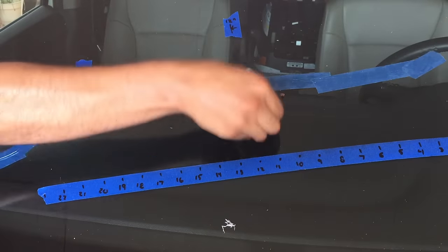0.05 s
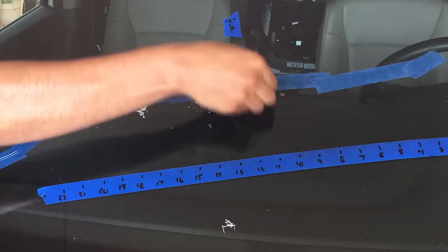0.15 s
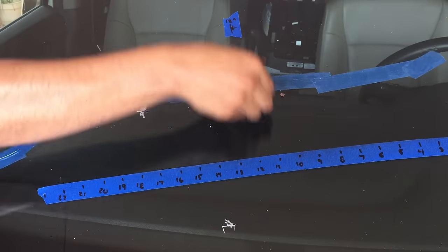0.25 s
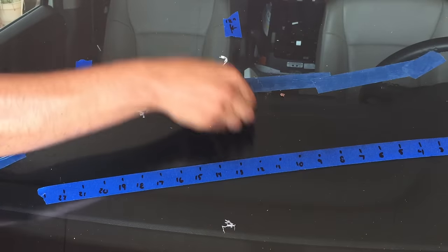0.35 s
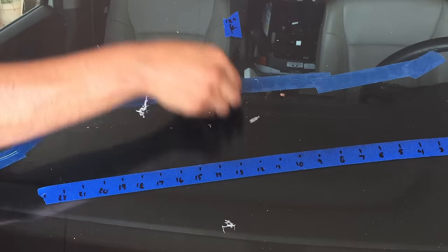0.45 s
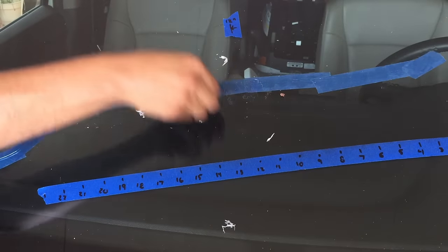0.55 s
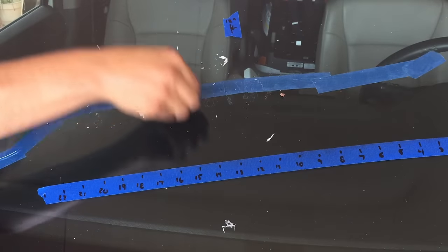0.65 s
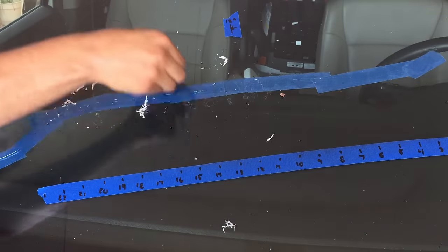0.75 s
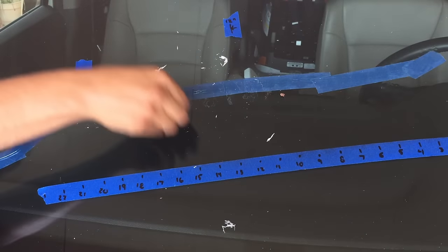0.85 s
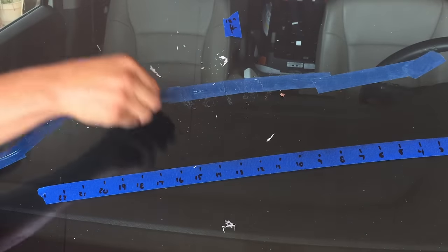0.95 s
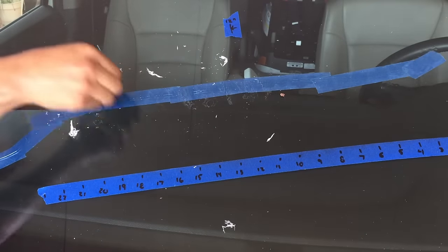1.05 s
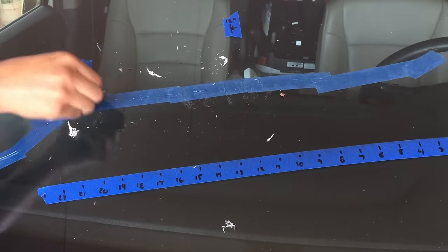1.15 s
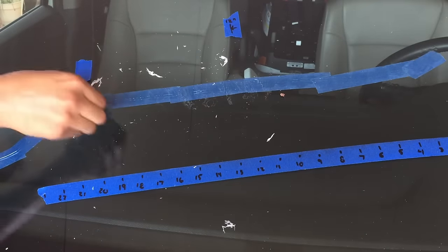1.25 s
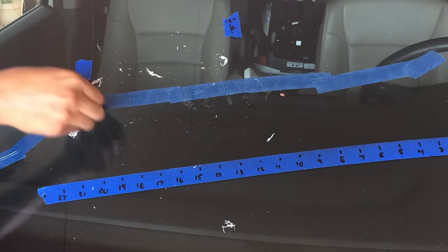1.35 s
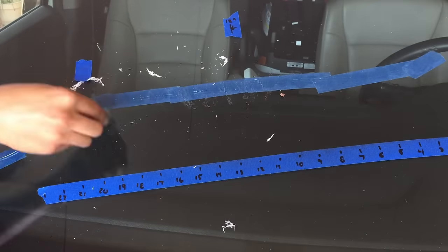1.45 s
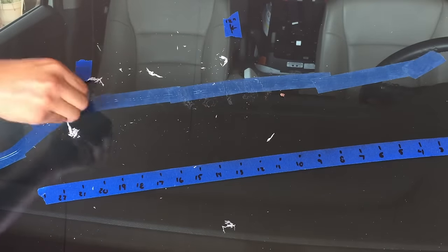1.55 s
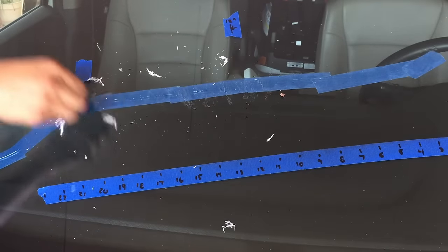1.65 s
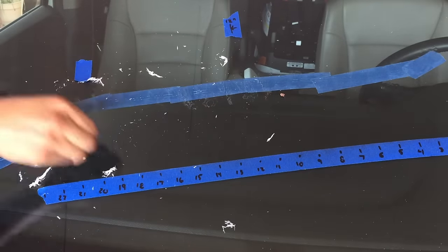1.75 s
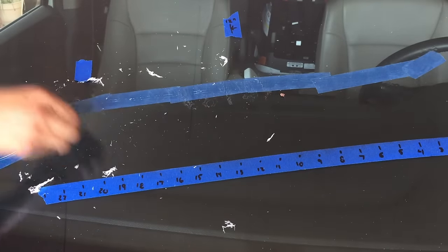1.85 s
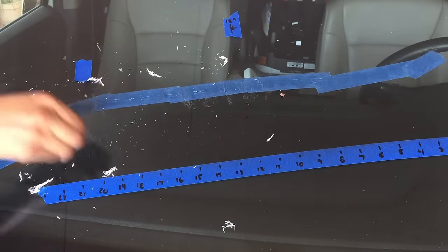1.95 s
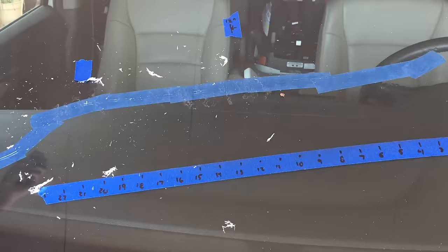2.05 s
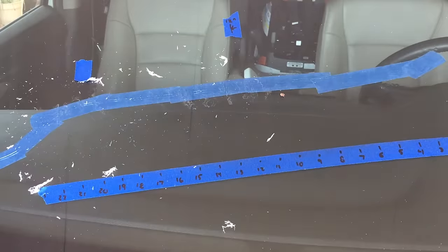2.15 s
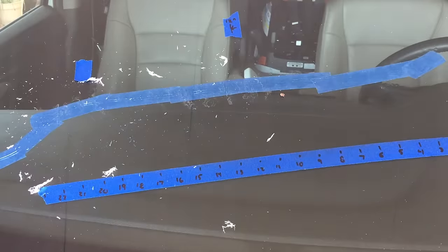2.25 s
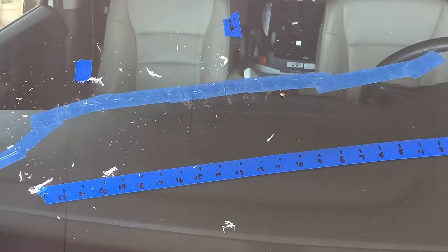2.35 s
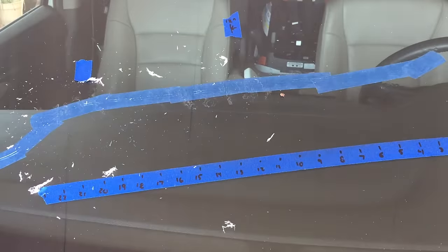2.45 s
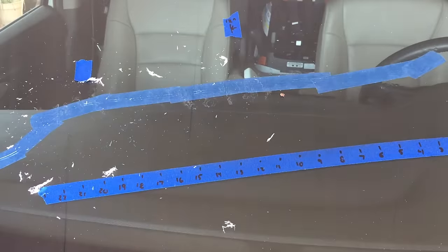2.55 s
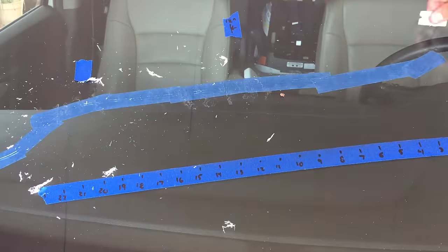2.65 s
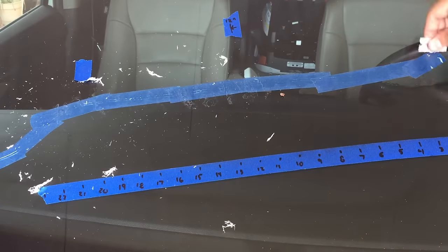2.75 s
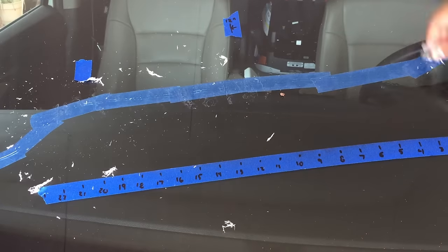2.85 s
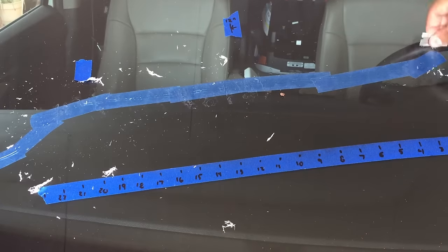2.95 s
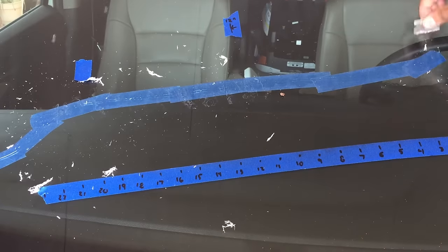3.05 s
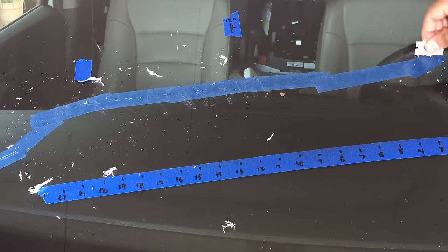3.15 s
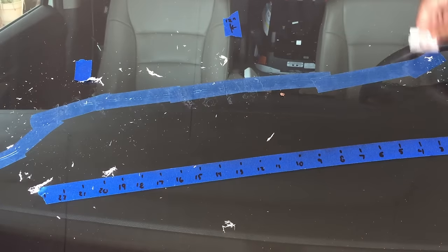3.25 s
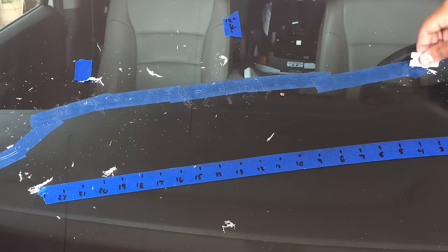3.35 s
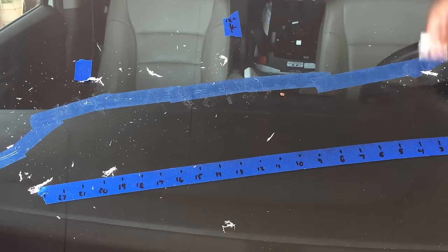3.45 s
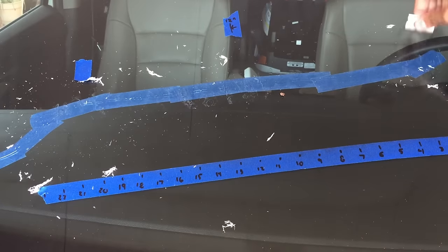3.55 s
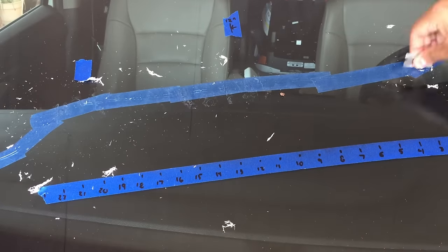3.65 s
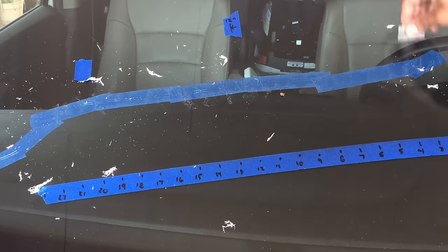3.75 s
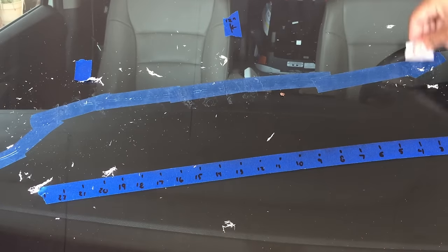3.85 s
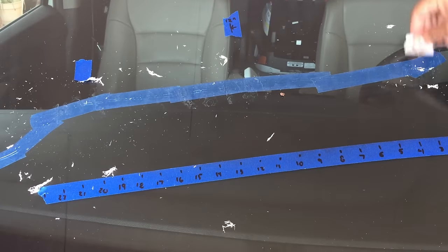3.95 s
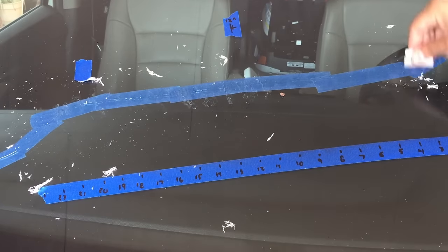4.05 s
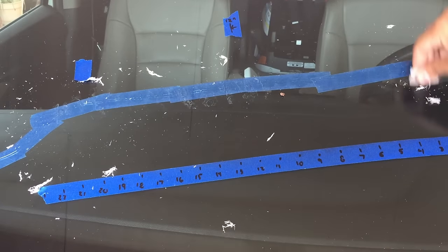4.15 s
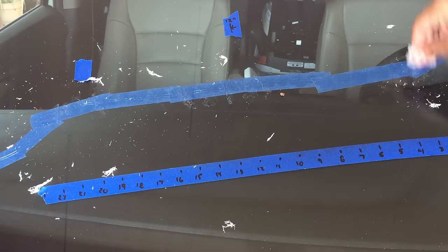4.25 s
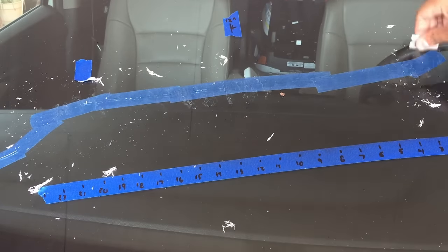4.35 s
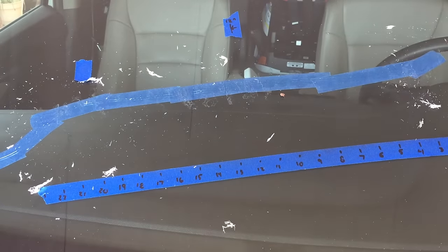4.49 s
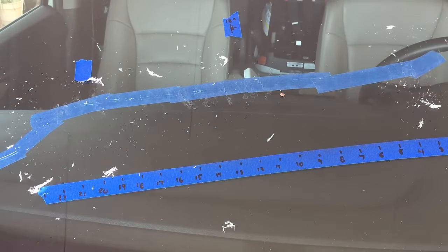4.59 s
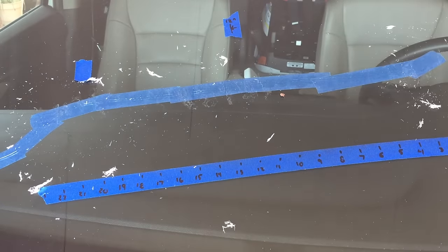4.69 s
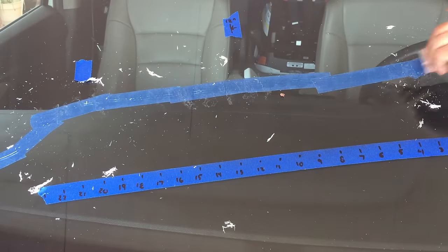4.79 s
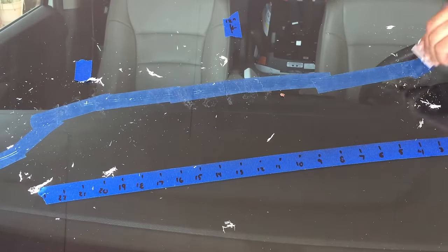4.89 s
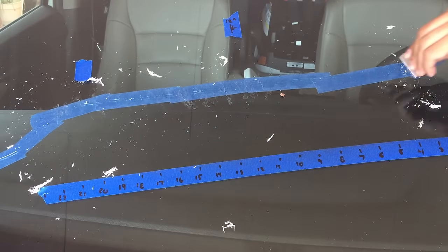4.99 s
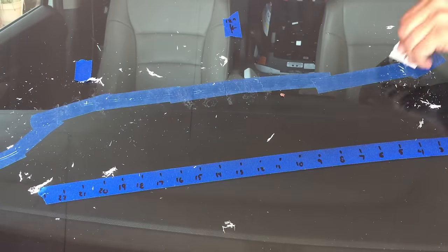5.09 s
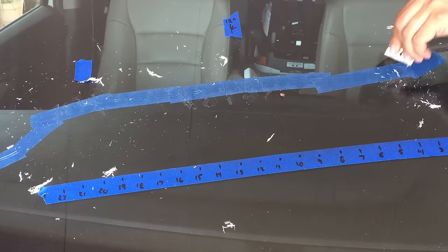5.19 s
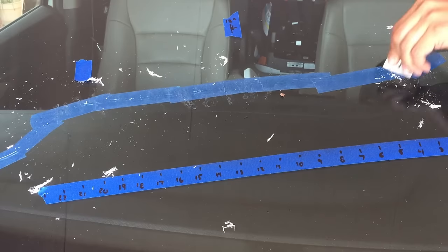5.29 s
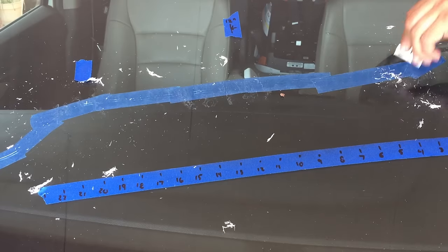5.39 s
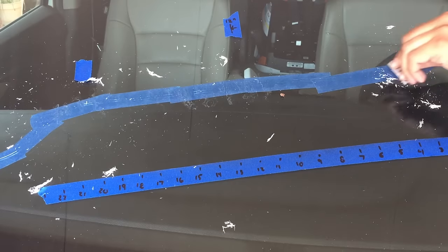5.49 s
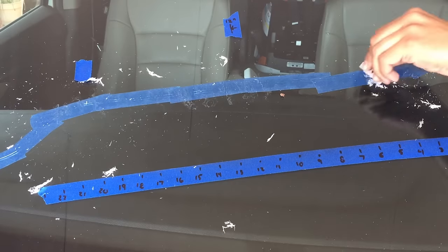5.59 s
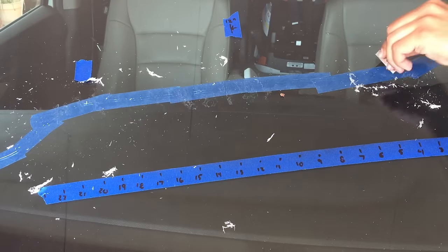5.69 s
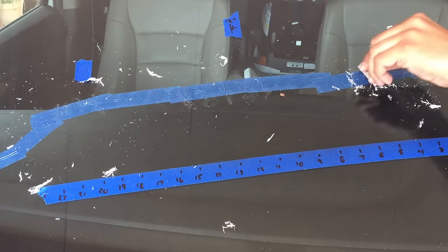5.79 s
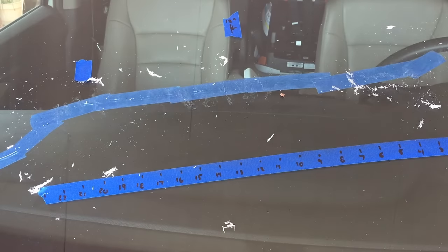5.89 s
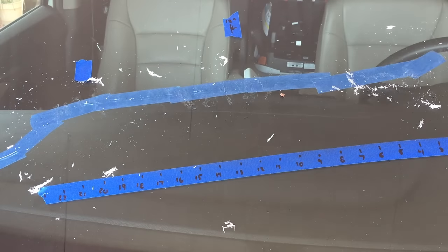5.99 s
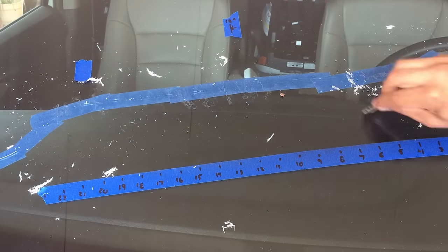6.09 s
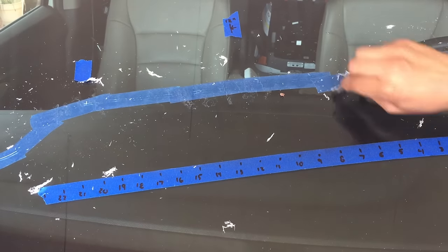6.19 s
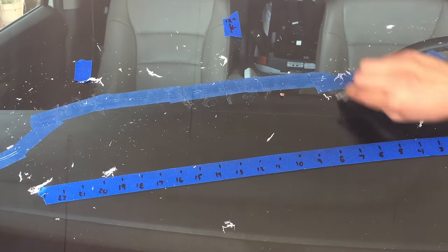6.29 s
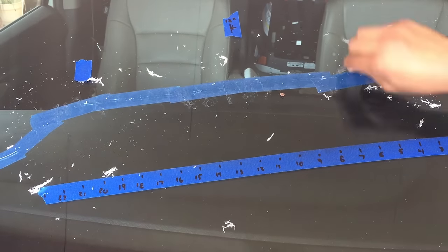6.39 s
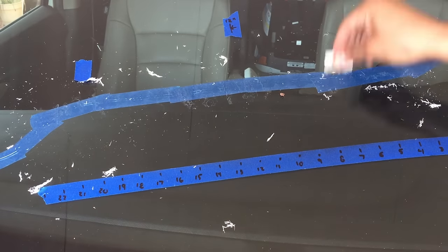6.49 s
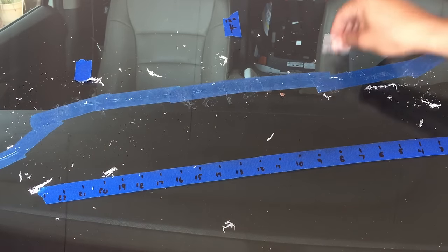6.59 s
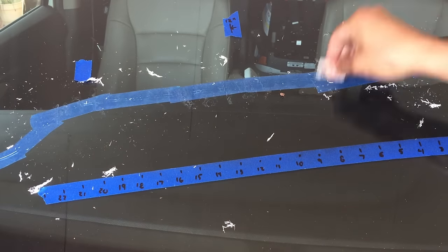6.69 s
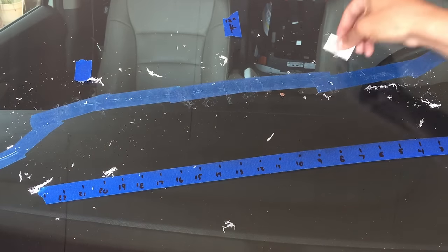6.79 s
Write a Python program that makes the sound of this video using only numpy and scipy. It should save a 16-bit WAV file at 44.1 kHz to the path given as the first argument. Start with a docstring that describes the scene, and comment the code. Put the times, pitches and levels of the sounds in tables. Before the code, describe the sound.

Fast-motion blade work on glass: some thirty gritty ticks and scrapes a second, each a tiny crackling bite with a short skid, a faint glassy ring and bright sizzle. The first long stretch is strongest, and stops just after two seconds. Later bursts are thinner and tinnier, then rougher near the end. Steady pitched motor hum and faint air fill the gaps; a far engine's sped-up drone passes briefly twice. Close, dry, mono outdoor sound.

```python
"""A razor blade chops in short strokes, sped up about eightfold, at hardened resin on a car windshield, outdoors.
Each stroke is a noise burst of tiny cracks, filtered into scratch, thump, sizzle, glass and blade rings.
Sped-up motor hum: wavering multiples of three base pitches, and fuzzy bands of noise.
A thin wash of air is shaped noise; twice a distant engine drones on two multiples of its firing rate."""
import sys
import numpy as np
from scipy import signal
from scipy.fft import rfft, irfft
from scipy.io import wavfile
from scipy.ndimage import uniform_filter1d

SR = 44100
rng = np.random.default_rng(int(sys.argv[2]) if len(sys.argv) > 2 else 0)


def log_audio(samples):
    """Write samples as a 16-bit WAV file to the path given in sys.argv[1]."""
    # one column per channel
    frames = np.atleast_2d(samples).T
    # limit to full scale, then quantise
    limited = np.clip(frames, -1, 1)
    pcm = np.round(limited * 32767).astype(np.int16)
    wavfile.write(sys.argv[1], SR, pcm)


N = 301195
SPAN, LEAD = 4096, 512  # samples: one stroke's buffer, the part of it before the hit


def gain_of(db):
    """Amplitude factor of a level in dB."""
    return 10 ** (np.asarray(db) / 20)


def evened(x):
    """Scale each row to unit rms."""
    return x / np.sqrt(np.mean(abs(x) ** 2, axis=-1, keepdims=True) + 1e-20)


def read(points, hz):
    """Straight dB lines on a log-frequency axis, -100 dB outside the table."""
    point_hz, db = np.transpose(points)
    return np.interp(np.log(hz + 1), np.log(point_hz + 1), db, -100, -100)


def fuzzy_line(hz, width_hz):
    """A tone whose strength and phase wander, the faster the wider the line."""
    keep = np.exp(-np.pi * width_hz / SR)
    noise = rng.standard_normal(N) + 1j * rng.standard_normal(N)
    wander = evened(signal.lfilter([1], [1, -keep], noise))
    return wander * np.exp(2j * np.pi * np.cumsum(hz * np.ones(N)) / SR)


# Spectrum shape of the air. Each row: frequency in Hz, relative level in dB per Hz.
AIR_SHAPE = [(30, -52), (200, -52), (290, -13.5), (380, 5.5), (700, 6.5), (1300, 4.5), (2500, -2),
             (3700, -7), (7000, -5), (10000, -10.5), (15500, -14.5), (16100, -44)]
AIR_RMS_DB, PATCH_DB = -42.5, 1.2


def air():
    """Random short-time spectra with mild drifting patches."""
    frames, hz = N // 256 + 5, np.fft.rfftfreq(1024, 1 / SR)
    real, imag, patches = rng.standard_normal((frames, 513, 3)).T
    patches = uniform_filter1d(patches, size=12, axis=0)  # over frequency bins
    patches = evened(uniform_filter1d(patches, size=10, axis=1))  # over frames
    spectra = (real + 1j * imag) * gain_of(read(AIR_SHAPE, hz)[:, None] + PATCH_DB * patches)
    wash = signal.istft(spectra, nperseg=1024, noverlap=768)[1][:N]
    return gain_of(AIR_RMS_DB) * evened(wash)


# Sped-up hums. Each row: base pitch in Hz, list of lines (multiple, rms level in dB, waver width in Hz).
HUM_LINES = [(469.3, [(1, -52, 4), (3, -52.5, 2.1), (4, -50, 27), (14, -51, 1.3), (16, -58, 5.7),
             (20, -62, 3)]), (568.4, [(1, -49, 5.2), (2, -46, 1.7), (3, -54, 6.1), (4, -60.5, 9.2),
             (6, -60.5, 8.1), (9, -60.5, 9.9)]), (960, [(1, -63.5, 3.8), (2, -55.5, 5)])]
# Fuzzy bands. Each row: centre in Hz, width in Hz, rms level in dB.
WHIRR_BANDS = [(476, 8.2, -79), (3370, 70, -56.5), (4980, 170, -59.5), (2120, 23, -58.5)]
WAVER = 0.28  # fuzzy part, relative to the steady core


def motor_hum():
    """Multiples of a base pitch that waver around a steady core, and a few fuzzy bands."""
    out, t = np.zeros(N), np.arange(N) / SR
    for base_hz, lines in HUM_LINES:
        for multiple, db, width_hz in lines:
            hz = round(multiple) * base_hz
            core = np.exp(2j * np.pi * (hz * t + rng.random()))
            out += gain_of(db) * evened((core + WAVER * fuzzy_line(hz, width_hz)).real)
    for hz, width_hz, db in WHIRR_BANDS:
        out += gain_of(db) * evened(fuzzy_line(hz, width_hz).real)
    return out


# Distant engine, one table per pass. Each row: time in seconds, firing rate in Hz,
# steady rms level in dB of the 2nd multiple, of the 3rd.
ENGINE_PASSES = [
    [(1.8, 405, -60, -70), (1.835, 408, -43, -66), (1.99, 440, -42, -66), (2.04, 445, -60, -70)],
    [(4.75, 356, -62, -70), (4.79, 356, -47, -60), (4.92, 356, -48, -47), (5.08, 356, -45, -62),
     (5.14, 354, -56, -62), (5.2, 353, -46, -58), (5.56, 350, -47, -58), (5.7, 342, -64, -70),
     (5.93, 337, -51, -70), (6.13, 335, -50, -70), (6.2, 334, -60, -70)],
]


def engine():
    """Two multiples of a gliding firing rate, each a steady tone plus a wavering one."""
    out, t = np.zeros(N), np.arange(N) / SR
    for rows in ENGINE_PASSES:
        time_s, rate_hz, *levels_db = np.transpose(rows)
        firing_hz = np.interp(t, time_s, rate_hz)
        for multiple, db in zip((2, 3), levels_db):
            steady = np.exp(2j * np.pi * multiple * np.cumsum(firing_hz) / SR)
            tone = (steady + .4 * fuzzy_line(multiple * firing_hz, 12)).real
            out += gain_of(np.interp(t, time_s, db, -200, -200)) * tone
    return np.sqrt(2) * out  # sine peak to rms


# Blade strokes. Each row: start in seconds, bite length in ms, scratch rms level over the bite in dB.
STROKE_ROWS = [(0.0124, 1.9, -29.5), (0.0419, 7.1, -24.5), (0.0738, 4.3, -23), (0.1066, 5.8, -24.5),
               (0.1332, 4.8, -35), (0.153, 2.1, -12.5), (0.175, 2.5, -27), (0.196, 5.7, -20),
               (0.218, 2.5, -32), (0.2374, 5.4, -19.5), (0.2761, 1.4, -14), (0.318, 3.4, -17),
               (0.3604, 5.2, -22), (0.3998, 2.8, -23.5), (0.4436, 7.4, -16.5), (0.4817, 4.9, -23.5),
               (0.522, 2.8, -26), (0.5413, 3, -30), (0.5628, 2.8, -23), (0.583, 1.6, -26),
               (0.6043, 6.2, -16), (0.641, 4.8, -19), (0.665, 2.1, -28), (0.6821, 4.5, -14),
               (0.7213, 6.3, -15.5), (0.7582, 9, -18.5), (0.793, 3.2, -12.5), (0.8316, 4.8, -19.5),
               (0.8539, 8, -35), (0.872, 4.5, -19.5), (0.892, 8.2, -34), (0.913, 4.3, -25.5),
               (0.9393, 8.3, -33.5), (0.9777, 3.8, -19), (0.9842, 4.1, -19.5), (1.0137, 9, -24),
               (1.0496, 7.6, -28.5), (1.0917, 2.9, -16), (1.1203, 2.6, -18.5), (1.1269, 5.9, -20.5),
               (1.163, 1.9, -24.5), (1.195, 3.7, -28.5), (1.212, 2.1, -29), (1.2276, 4.9, -15.5),
               (1.2614, 7.8, -23), (1.2948, 8.2, -27.5), (1.3308, 8.7, -39), (1.359, 14, -27.5),
               (1.3954, 6.8, -23.5), (1.4282, 4.2, -22.5), (1.455, 5.9, -28.5), (1.4857, 4.1, -22),
               (1.6017, 5.2, -32.5), (1.6372, 3.6, -20.5), (1.668, 3.3, -25.5), (1.7012, 3.9, -26),
               (1.739, 2.4, -18.5), (1.7746, 3.0, -26.5), (1.79, 3.2, -29), (1.8123, 3.4, -21.5),
               (1.822, 4.4, -27), (1.8373, 5.7, -29.5), (1.8453, 4.4, -24.5), (1.8761, 6.6, -25.5),
               (1.9094, 3.6, -17), (1.9405, 5, -20.5), (1.953, 12, -35), (1.975, 3, -11.5),
               (2.009, 3.3, -11), (2.025, 2.8, -28), (2.0445, 4, -14.5), (2.078, 4.5, -14),
               (2.7768, 4.2, -23.5), (2.8031, 2.3, -25.5), (2.8307, 3, -23.5), (2.8567, 5.1, -26),
               (2.8844, 2.8, -24.5), (2.9105, 3.4, -25.5), (2.9366, 5.2, -27), (2.9637, 8.1, -29),
               (2.9918, 5.5, -27.5), (3.0212, 3.7, -28.5), (3.0453, 4.3, -34), (3.1799, 1.8, -24),
               (3.2063, 2.8, -31), (3.233, 1.6, -24.5), (3.2577, 3.6, -28.5), (3.2849, 5.5, -26.5),
               (3.3132, 1.8, -21), (3.3417, 2.5, -21.5), (3.3693, 5, -20.5), (3.3992, 5.1, -21),
               (3.4313, 2.4, -21), (3.463, 7.1, -25), (3.5026, 6.9, -26), (3.5414, 3.8, -28),
               (3.5806, 2.6, -26.5), (3.616, 9, -31.5), (3.6529, 4.8, -24.5), (3.6918, 4.5, -30),
               (3.7257, 4.6, -23.5), (3.9238, 7.7, -35), (3.9579, 4.5, -27.5), (3.9921, 6.6, -40),
               (4.0244, 2.2, -25), (4.0587, 4.1, -24), (4.0893, 6.4, -28), (4.1223, 6.6, -22.5),
               (4.1565, 4.7, -20), (4.19, 2.7, -17.5), (4.2262, 2.7, -15), (4.2671, 7.9, -23),
               (4.3058, 3.4, -18.5), (4.3432, 2, -17), (4.382, 7.3, -26.5), (4.4175, 2.3, -25),
               (4.4504, 4.2, -27.5), (4.483, 5.3, -23.5), (4.5169, 3.5, -29), (4.8484, 4.5, -30),
               (4.8591, 5.8, -32), (4.892, 3.4, -29.5), (4.9206, 8.5, -34), (4.9584, 2.6, -25),
               (5.031, 2.6, -29), (5.041, 3.2, -22), (5.071, 4.6, -23), (5.1048, 4.2, -22.5),
               (5.159, 3.9, -34.5), (5.1779, 1.9, -23), (5.2151, 4.6, -31), (5.2511, 6.5, -28),
               (5.2867, 4.2, -31.5), (5.3236, 3.5, -28), (5.357, 9.1, -37.5), (5.397, 4.9, -26.5),
               (5.4369, 6, -24.5), (5.4777, 9.6, -27), (5.521, 7.3, -29.5), (5.5517, 8.9, -21.5),
               (5.589, 6.1, -24), (5.6272, 4.4, -20), (5.6643, 9.5, -27.5), (5.704, 6, -21.5),
               (5.744, 6.8, -22), (5.7844, 9.5, -21), (5.82, 13, -35), (5.8596, 8.1, -20.5),
               (5.8956, 9.2, -27), (6.2076, 4.1, -25.5), (6.2335, 5.6, -24), (6.2617, 6.4, -24.5),
               (6.291, 4.6, -22), (6.3189, 7.2, -23), (6.3488, 5.8, -24), (6.3762, 6, -22),
               (6.4051, 3, -17), (6.4313, 8.4, -20.5), (6.463, 8.5, -21), (6.548, 4.4, -35),
               (6.575, 4.2, -25), (6.6015, 5.4, -31.5), (6.6312, 1.2, -19), (6.6581, 3.2, -25),
               (6.6887, 1.6, -21), (6.719, 2.3, -33.5), (6.747, 2.9, -23.5), (6.7754, 4, -21.5)]
# Runs of strokes. Each row: start in seconds, end in seconds,
# upper glass rings in dB above the scratch, mean of higher over lower of those two rings in dB,
# mean skid level in dB re bite, mean scratch level of the return ticks in dB.
RUNS = [(0, 0.415, -8, -2, -20.5, -41), (.42, .96, -17.5, -3, -21, -35), (0.957, 1.5, -26, -23, -19, -42.5),
        (1.55, 2.09, -30, 16, -19, -46), (2.7, 3.06, -7, 30, -22, -42), (3.108, 3.74, -8, 36, -21.5, -47.5),
        (3.852, 4.53, -11, 29, -24, -54), (4.8, 5.4, -2.5, 4, -16, -48), (5.4, 5.91, -3, 6, -26, -49),
        (6.106, 6.485, -7.5, 14, -16, -61), (6.53, 6.8, -8.5, 3, -21, -51)]
TICK_SHARE, TICK_AT, TICK_MS, TICK_SPREAD_DB = .6, .52, 4.6, 3.  # TICK_AT: mean, as share of the gap


def all_strokes():
    """The strokes and, between close neighbours, the faint ticks of the blade coming back."""
    start_s, length_ms, db = np.transpose(STROKE_ROWS)
    run_start_s, run_tick_db = np.transpose(RUNS)[[0, -1]]
    gap_s = np.diff(start_s)
    luck, jitter = rng.random(len(gap_s)), rng.standard_normal((len(gap_s), 2))
    tick_s = start_s[:-1] + gap_s * np.clip(TICK_AT + 0.095 * jitter[:, 0], .2, .8)
    tick_db = run_tick_db[np.searchsorted(run_start_s, start_s[:-1]) - 1] + TICK_SPREAD_DB * jitter[:, 1]
    absent = (luck > TICK_SHARE) | (gap_s < .026) | (gap_s > .05)
    ticks = np.array([tick_s, np.full(len(gap_s), TICK_MS), tick_db - 99 * absent])
    return np.hstack([[start_s, length_ms, db], ticks])[:, :, None]


def cracks(length_ms, skid_db, grit_db=2.5, rise=0.036, fall=0.47, skid_ms=16):
    """The bite holds, dies away, and leaves a rasping skid; single cracks stand out of it."""
    t_ms = (np.arange(SPAN) - LEAD) / SR * 1000
    grain, grit, clumps = rng.standard_normal((3, len(length_ms), SPAN))
    clumps = evened(uniform_filter1d(clumps, size=40))  # the blade catches and slips
    after_ms = np.maximum(t_ms - fall * length_ms, 0)
    bite = gain_of(2.44 * clumps) * np.exp(-after_ms / (0.68 * length_ms))
    skid = gain_of(skid_db + 5.1 * clumps) * np.exp(-after_ms / skid_ms)
    lead_in = gain_of(-11.0) * np.exp(np.minimum(t_ms, 0) / 1.8) * (t_ms < 0)
    onset = np.clip(t_ms / (rise * length_ms), 0, 1) + lead_in
    return grain * gain_of(grit_db * grit) * (bite + skid) * onset


# Scratch spectrum. Each row: frequency in Hz, relative level in dB per Hz.
SCRATCH_SHAPE = [(200, -26), (420, -4.5), (1000, -1.5), (1570, 2), (3000, -1), (6000, -3), (8000, -8),
                 (9500, -21.5)]
RIPPLE_RMS_DB = 2.5


def scratch_path(hz, count):
    """Broad random humps vary the scratch colour from stroke to stroke."""
    cycles = rng.random((count, 4, 1)) + np.arange(1, 5)[:, None] * np.log(hz + 1) / 2
    ripple_db = RIPPLE_RMS_DB * np.sin(2 * np.pi * cycles).sum(axis=1) / np.sqrt(2)
    return gain_of(read(SCRATCH_SHAPE, hz) + ripple_db)


# Upper glass modes, lower then higher. Each row: frequency in Hz, T60 in seconds.
UPPER_GLASS_MODES = [(1375, 0.031), (1600, 0.021)]


def upper_glass_path(hz, lean_db):
    """Spectrum of two dying sines; their balance varies from stroke to stroke."""
    t = np.arange(SPAN) / SR
    mode_hz, t60_s = np.transpose(UPPER_GLASS_MODES)[:, :, None]
    lower, higher = rfft(evened(gain_of(-60 * t / t60_s) * np.sin(2 * np.pi * mode_hz * t)))
    no_bass = (hz / np.hypot(hz, 900)) ** 4
    return no_bass * (lower + gain_of(lean_db + 2.0 * rng.standard_normal(lean_db.shape)) * higher)


# Low pane mode: mean frequency in Hz, T60 in seconds.
LOW_GLASS_MODE = (949, 0.033)


def low_glass_ring(count):
    """One push swings the whole pane: a slightly detuned dying sine with a soft onset."""
    t = np.maximum(np.arange(SPAN) - LEAD, 0) / SR
    mode_hz, t60_s = LOW_GLASS_MODE
    detune, phase = rng.standard_normal((2, count, 1))
    swing = np.sin(2 * np.pi * (mode_hz * (1 + 0.022 * detune) * t + phase))
    return evened(swing * gain_of(-60 * t / t60_s) * (1 - np.exp(-t / .0016)) ** 2)


# Blade modes. Each row: mean frequency in Hz, width in Hz of each of two cascaded resonances.
BLADE_MODES = [(2350, 640), (4100, 720), (5450, 690), (6900, 520), (7600, 300), (13800, 1900)]
# The grip of each run frees some blade modes and damps others.
# Each row: mean level in dB above the scratch of modes 1 to 6.
GRIP_LEVELS = [(-30, -17.5, -27, -31, -30, -18), (-29, -40, -32, -18, -22, -9.5),
               (-30, -31, -37, -17, -20, -13), (-34, -40, -30, -24, -26, -22),
               (-15.5, -21, -12.5, -7.5, -14, -18), (-13, -16.5, -7.5, -8, -9.5, -27),
               (-21, -24, -16, -22, -17, -29), (-10, -22, -34, -33, -27, -23),
               (-11, -42, -18.5, -14, -13, -35), (-18, -40, -25, -24, -27, -38),
               (-28, -34, -35, -21, -31, -25)]
CLIMB_DB, MODE_SCATTER_DB, BEND = 2.5, 2, .015  # BEND: detuning spread as a share


def blade_paths(hz, run, along):
    """Blade resonances; the ring moves up the modes along a run, and each stroke detunes and stirs it."""
    bend = 1 + BEND * rng.standard_normal(run.shape)
    paths = []
    for k, (mode_hz, width_hz) in enumerate(BLADE_MODES):
        stirred_db = MODE_SCATTER_DB * rng.standard_normal(run.shape)
        climb_db = CLIMB_DB * (k - 2) * (along - .5)
        resonance = 1 / (1 + 2j * (hz - mode_hz * bend) / width_hz) ** 2
        paths.append((np.transpose(GRIP_LEVELS)[k][run] + stirred_db + climb_db, resonance))
    return paths


# The colour drifts as each run travels over the pane. Each row, mean dB above the scratch:
# thump at first, middle, last, low glass ring at first, middle, last, sizzle at first, middle, last.
RUN_DRIFTS = [(-26, -16, -13, 7, -9.5, -2.5, -5.5, -5, -1.7),
              (-14, -17, -14.5, -7.5, -10, -19, 0.7, 0.3, -1),
              (-11, -9.5, -15, -23, -21, -11, -2, -1, -1.1),
              (-25, -13.5, -10.5, -0.5, -14.5, -15, -4, -3, -1.5),
              (-14, -23, -9, -17, -25, -6, -3, -2.5, 5), (-24, -26, -13, 1, -22, -11, -14.5, -3, 3),
              (-28, -23, -20, 1, -14.5, -35, -12, -4.5, 0.5),
              (-18, -23, -15.5, -4.5, -9, -4.5, -5, -6, -5.5),
              (-21, -19.5, -16, -9, -6.5, -4.5, -5, -4.5, -4), (-22, -18, -12, 9, 4, -1.5, -1, -7, -3),
              (-28, -11.5, -17, -7, 3.5, -9, -11, -8.5, -2.5)]
# Stroke-to-stroke spread in dB: thump, low ring, sizzle.
SPREAD_DB = (3., 2.5, 2.5)
USUAL_DB, RING_LAG = -26, 0.35  # RING_LAG: dB less ring growth per dB of scratch above USUAL_DB


def drifting_levels(run, along, scratch_db):
    """Thump, low ring and sizzle in dB above the scratch; the ring grows less than the scratch."""
    first, middle, last = np.reshape(RUN_DRIFTS, (-1, 3, 3)).T[:, :, run]
    toward_end = np.where(along < .5, first - middle, last - middle)
    scatter_db = rng.standard_normal((len(run), 3)) * SPREAD_DB
    thump_db, low_db, sizzle_db = middle + toward_end * abs(2 * along - 1) + scatter_db.T[:, :, None]
    return thump_db, low_db - RING_LAG * np.clip(scratch_db - USUAL_DB, -12, 12), sizzle_db


# Body thump and sizzle spectra. Each row: frequency in Hz, relative level in dB per Hz.
THUMP_SHAPE = [(15, -5), (60, 0), (160, -0.5), (320, -4), (600, -20)]
SIZZLE_SHAPE = [(7000, -15.5), (9000, -1), (10500, 0.5), (15000, -1), (15700, -1), (16100, -36),
                (17000, -48)]


def razor():
    """Every stroke knocks the pane and sends its cracks through the scratch, the glass, the blade and the body."""
    start_s, length_ms, scratch_db = all_strokes()
    length_ms, count = np.clip(length_ms, 1, 20), len(start_s)
    run = np.maximum(np.searchsorted(np.transpose(RUNS)[0], start_s) - 1, 0)
    run_start_s, run_end_s, upper_db, lean_db, skid_db, _ = np.transpose(RUNS)[:, run]
    along = np.clip((start_s - run_start_s) / (run_end_s - run_start_s), 0, 1)
    thump_db, low_db, sizzle_db = drifting_levels(run, along, scratch_db)

    hz = np.fft.rfftfreq(SPAN, 1 / SR)
    burst = rfft(cracks(length_ms, skid_db + 2.4 * rng.standard_normal((count, 1))))
    paths = [(0., scratch_path(hz, count)),
             (thump_db, gain_of(read(THUMP_SHAPE, hz))),
             (sizzle_db, gain_of(read(SIZZLE_SHAPE, hz))),
             (upper_db, upper_glass_path(hz, lean_db))] + blade_paths(hz, run, along)
    sound = gain_of(low_db) * low_glass_ring(count)
    for db, path in paths:
        sound += gain_of(db) * evened(irfft(burst * path))
    # rms over the buffer to rms over the bite
    sound *= gain_of(scratch_db) * np.sqrt(length_ms / 1000 * SR / SPAN)

    out = np.zeros(N + SPAN + LEAD)
    np.add.at(out, np.round(start_s * SR).astype(int) + np.arange(SPAN), sound)
    return out[LEAD:LEAD + N]


def scene():
    """Sum of all sources, one channel."""
    return (air() + motor_hum() + engine() + razor())[None]


EDGE_HZ = 16900


def record(dry):
    """The loudest cracks saturate softly; then the band limit."""
    saturated = .85 * np.tanh(dry / .85)
    lowpass = signal.firwin(511, EDGE_HZ, window=("kaiser", 9), fs=SR)
    return signal.oaconvolve(saturated, lowpass[None], "same")


dry = scene()
out = record(dry)
log_audio(out)
```